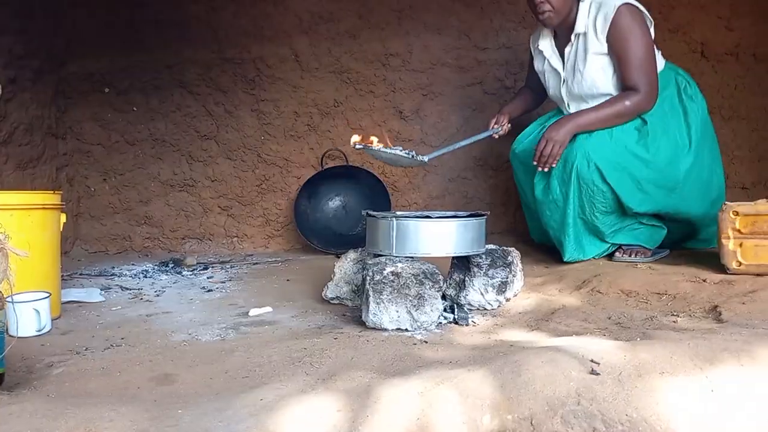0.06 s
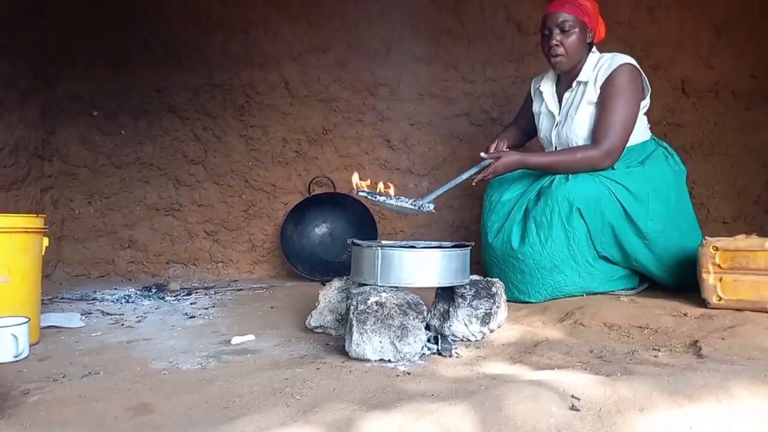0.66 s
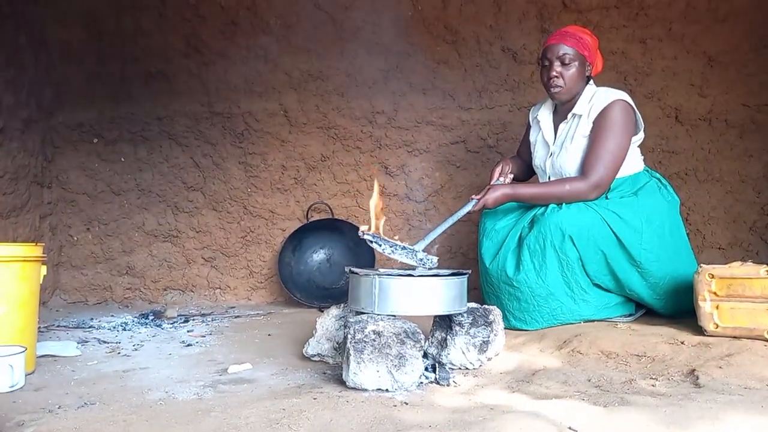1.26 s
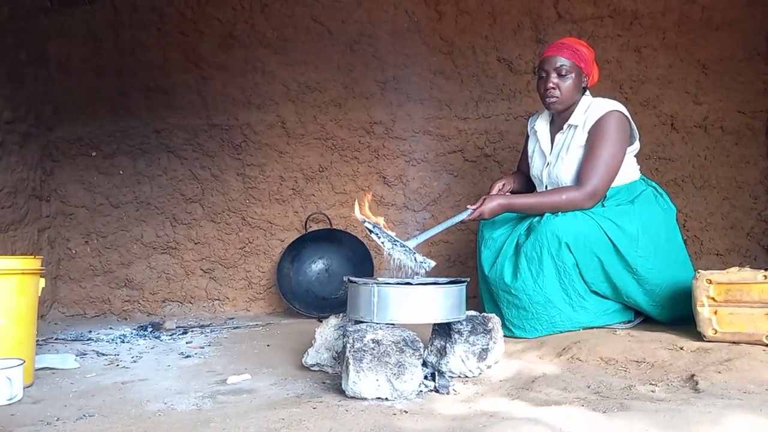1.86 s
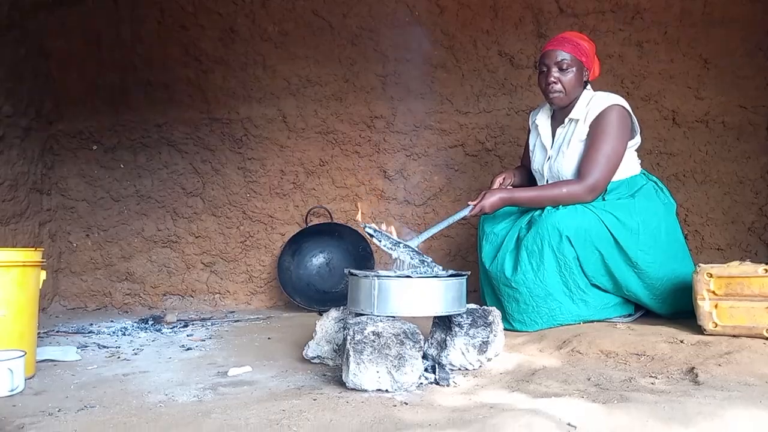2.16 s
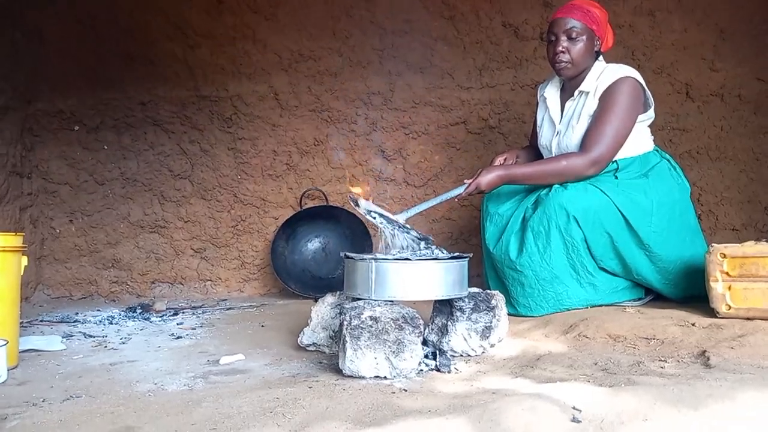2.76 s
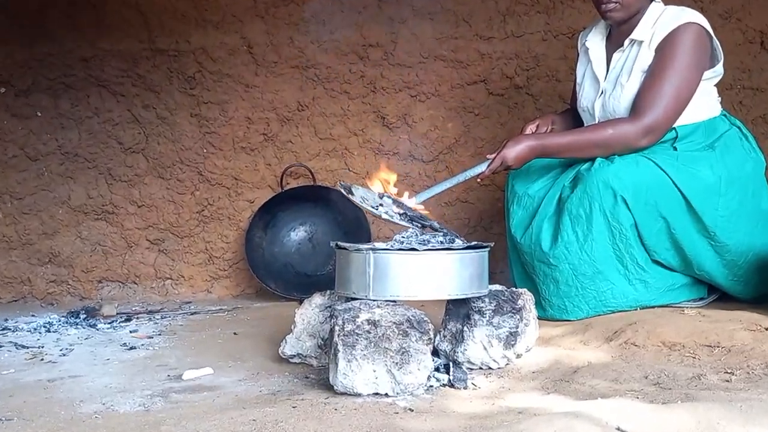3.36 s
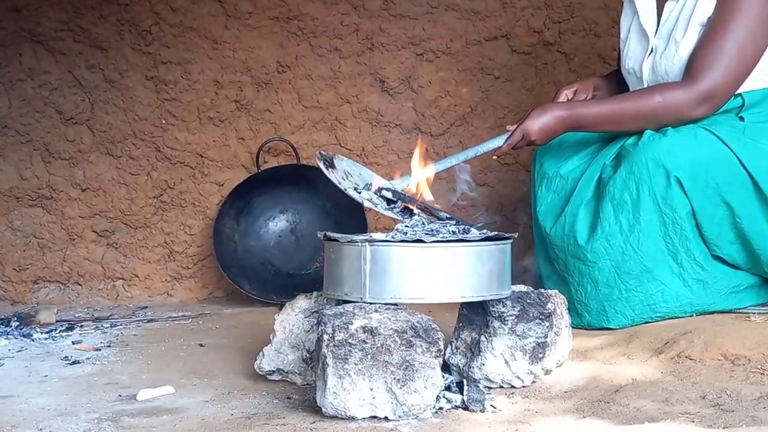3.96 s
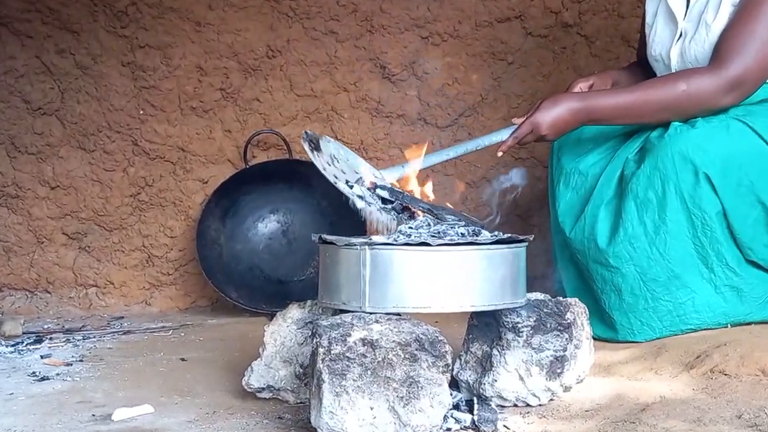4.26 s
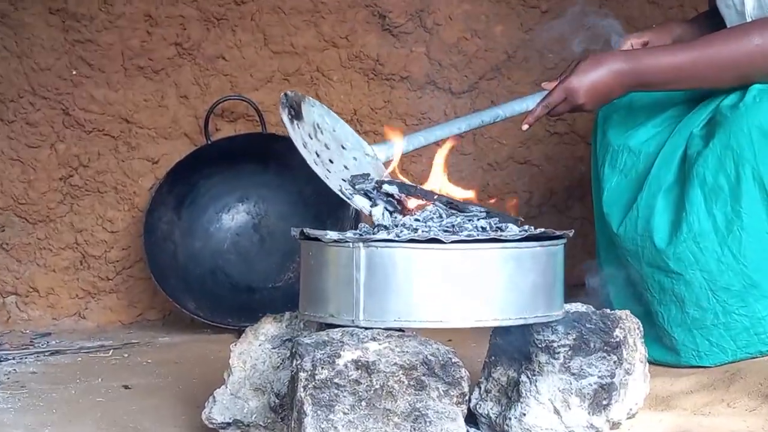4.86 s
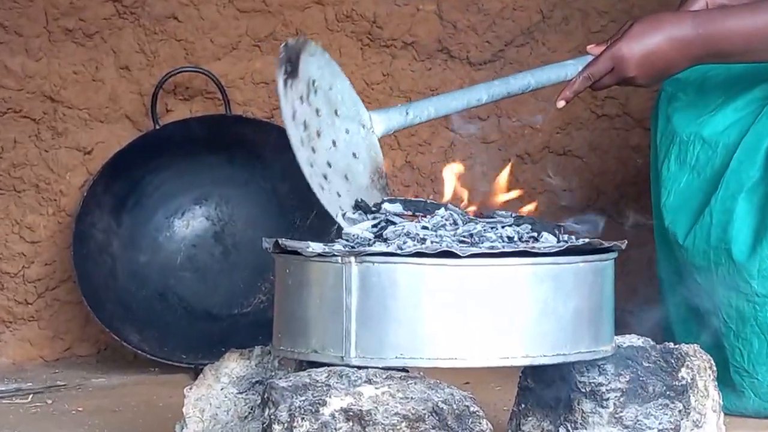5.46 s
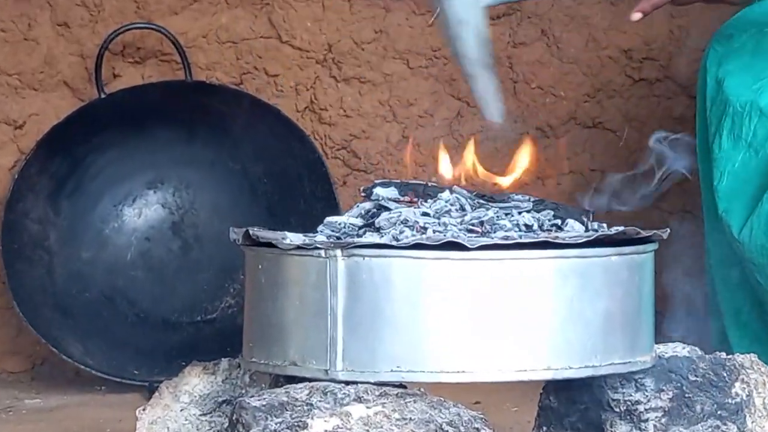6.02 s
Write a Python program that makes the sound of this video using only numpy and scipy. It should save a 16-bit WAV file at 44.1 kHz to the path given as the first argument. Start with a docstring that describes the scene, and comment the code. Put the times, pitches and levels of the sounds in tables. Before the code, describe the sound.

A metal ladle scrapes as embers clink and crunch across a thin sheet lid outdoors, with flames fluttering softly underneath.

```python
"""Burning charcoal tipped from a metal ladle onto a pot's thin sheet lid, before a mud wall.
Flames flutter and flare throughout. A far bird calls over the first 1.7 s; cloth rustles near 0.8 s.
At 1.1 s the first lumps knock the lid's modes into ringing. From 1.8 to 3.3 s the main pour: embers
rattle the sheet, crumbs crunch. Then the heap settles with short slips and ladle scrapes; heavy lumps
rock the pot from 3.9 s, and a coal cracks sharply at 4.7 s."""
import sys
import numpy as np
from scipy import signal
from scipy.fft import rfft, irfft
from scipy.io import wavfile

SR = 44100
rng = np.random.default_rng(int(sys.argv[2]) if len(sys.argv) > 2 else 0)


def bounce(signal):
    """Save signal as a 16-bit WAV file at the path given by the first command-line argument."""
    frames = np.transpose(np.atleast_2d(signal))
    limited = np.clip(frames, -1, 1)
    pcm = np.round(limited * 32767).astype(np.int16)
    wavfile.write(sys.argv[1], SR, pcm)


N = 272969
TIME = np.arange(N) / SR
RING_TIME = TIME[:16384]


# Clear lid modes: (frequency [Hz], width [Hz], relative level [dB])
LID_MODES = [(140, 20, 6), (218, 14, 14), (236, 12, 19), (272, 20, 8), (332, 16, 14), (359, 14, 26),
             (381, 14, 30), (414, 18, 20), (510, 20, 7), (694, 16, 13), (797, 22, 20), (832, 18, 22),
             (1168, 34, 13), (1411, 14, 12), (1669, 14, 17), (2043, 24, 14), (2280, 32, 13), (2520, 40, 7),
             (2880, 70, 4), (3120, 110, 5), (3650, 50, 5), (4040, 30, 7), (4258, 20, 14), (4615, 16, 16),
             (4810, 20, 10), (4960, 24, 11), (5044, 26, 17), (5295, 40, 8), (5540, 60, 4)]
# Dense-mode spectrum: (frequency [Hz], gain [dB])
SHEET_SPECTRUM = [(60, 3), (130, -4), (185, -9), (350, 3), (460, -3.5), (1000, 3.5), (1700, -8),
                  (2900, 0.5), (5000, -1), (6400, -1.5), (8500, 5.5), (11000, 1.5), (13500, 5.5),
                  (16000, -3)]

def lid_response():
    """Struck sheet: a click of dense modes, clear modes ringing on."""
    size = len(RING_TIME)
    cepstrum = irfft(np.log(spectrum_gain(SHEET_SPECTRUM, size)))
    cepstrum[1:size // 2] *= 2  # fold to minimum phase
    cepstrum[size // 2 + 1:] = 0
    click = irfft(np.exp(rfft(cepstrum)))
    modes = 0
    for hz, width_hz, db in LID_MODES:
        decay = np.exp(-np.pi * width_hz * RING_TIME)
        modes += undb(db) * 2 * np.pi * width_hz / SR * decay * np.cos(2 * np.pi * hz * RING_TIME)
    return click + 0.49 * convolve(click, modes)[0]


# Lid registers boom, clang, ring, hiss: (low [Hz], high [Hz])
LID_BANDS = [(90, 600), (600, 2000), (2000, 6500), (6500, 17000)]
# Blows, before trims: (time [s], ring level [dB], weight [dB], hardness [dB], clink [Hz])
LID_BLOWS = [(1.1, -48.5, -21, 6, 10000), (1.13, -40.5, -11, -10, 2660), (1.143, -41, -9, -17, 2840),
             (1.246, -57.5, -2, 1, 4920), (1.258, -54.5, -7, 2.5, 5580), (1.666, -71, 21, 5, 2950),
             (1.811, -53, 7, 2.5, 8120), (1.822, -48.5, 10, -9, 3040), (1.873, -34.5, -0.5, -5.5, 2960),
             (1.915, -38, 4.5, -8, 2700), (1.962, -40.5, -7, -11, 3185), (2.016, -26, -16, -7, 5140),
             (2.03, -33.5, -3, -13, 4880), (2.054, -36, 8, -5, 4400), (2.092, -39.5, 8.5, -10, 2220),
             (2.129, -36.5, -4, 1.5, 12200), (2.224, -50, 0, 1.5, 7160), (2.295, -34.5, 2.5, -0.5, 4450),
             (2.323, -42, 9, -14, 2350), (2.385, -48, 2.5, -0.5, 3760), (2.466, -37.5, -6.5, -8, 4580),
             (2.547, -38, -2, -6.5, 2790), (2.595, -41.5, 5.5, -4.5, 3490), (2.703, -44.5, 0, -1.5, 4050),
             (2.737, -46, 11.5, -2, 2945), (2.791, -47, 0, -4.5, 3110), (2.839, -50, 9, -4, 3200),
             (2.891, -47.5, 5, -7.5, 3230), (2.964, -39.5, 2, 0.5, 3183), (3.031, -46.5, 3, -4.5, 3210),
             (3.06, -47.5, 4.5, -9, 2830), (3.098, -45, 1.5, -13, 3140), (3.312, -68, 6.5, -5.5, 5400),
             (3.609, -58, 4, -7.5, 3400), (3.837, -47, 6.5, -0.5, 3060), (3.866, -48, -2, 1.5, 8950),
             (3.988, -59.5, -13, 6, 8530), (4.412, -47, -1, 1, 3450), (4.457, -38, -5, -2.5, 3500),
             (4.468, -30, 3, -4, 2965), (4.518, -34, 4.5, -8.5, 3800), (4.595, -48, -10, 2, 5280),
             (4.675, -47.5, -16, -17, 3190), (4.784, -54.5, 5, -2.5, 5240), (4.813, -51, 0.5, -14, 5180),
             (5.298, -68, 15, 0, 3210), (5.482, -60, 15, 5, 8600), (5.589, -56, -13, -1.5, 3230),
             (5.826, -57.5, 6.5, -9, 5500), (5.91, -46.5, 5, -5, 3400), (6.048, -68.5, 16, -9, 3050),
             (6.163, -76, 23, -9, 3330)]

def knocks(lid, trims_db=(-3.5, -4, -3.5, -3.5), clink_db=-11, push=36, contact_s=0.0012):
    """Lumps and ladle strike the lid: weight adds boom and clang, hardness adds hiss."""
    out = np.zeros((2, N))
    soft_push = push * RING_TIME * np.exp(-4 * RING_TIME / contact_s) * (4 / contact_s) ** 2 / SR
    for s, level_db, weight_db, hardness_db, clink_hz in LID_BLOWS:
        clang_db = 0.5 * weight_db - 2.16
        shares_db = (weight_db, clang_db, 0, hardness_db)
        blow = convolve(yard() + soft_push, lid)
        blow = blow + undb(4) * resonate(blow, clink_hz, width_hz=700)
        for (lo_hz, hi_hz), share_db, trim_db in zip(LID_BANDS, shares_db, trims_db):
            part = band(blow, lo_hz, hi_hz)
            add(out, s, part * undb(level_db + share_db + trim_db) / rms(part[:, :SR // 40]))
            if lo_hz <= clink_hz < hi_hz:
                lump = clink(clink_hz, t60_s=0.14, scatter=0.17, count=7)
                add(out, s, undb(level_db + share_db + clink_db) * lump)
    return out


def clink(hz, t60_s, scatter, count, rise_s=0.001):
    """A charcoal lump rings in a few close modes, different on each side."""
    t = RING_TIME[:SR // 8]
    modes_hz = np.minimum(hz * np.exp(scatter * rng.standard_normal((count, 1))), SR * 0.4)
    phasors = rng.standard_normal((2, count)) + 1j * rng.standard_normal((2, count))
    ring = ((phasors + phasors.mean(axis=0)) @ np.exp(2j * np.pi * modes_hz * t)).imag
    ring = ring * fade(t60_s)[:len(t)] * (1 - np.exp(-t / rise_s))
    return ring / rms(ring[:, :SR // 40])


# Main pour, stalling twice, before trims: (time [s], boom level [dB], scrape level [dB])
POUR_LEVELS = [(1.795, -50, -67), (1.825, -38.5, -52.5), (1.94, -43, -54.5), (2.06, -30, -39.5),
               (2.17, -43.5, -47), (2.39, -42.5, -47.5), (2.445, -55, -71), (2.55, -46, -52),
               (2.76, -39, -52), (2.875, -58, -58), (2.94, -45.5, -52.5), (3.12, -46, -52),
               (3.28, -59.5, -77)]
# Slips as the ladle is shaken or drawn back: (time [s], length [s], hiss level [dB], weight [dB])
EMBER_SLIPS = [(0.53, 0.044, -77, 0), (1.155, 0.072, -56, -5), (1.468, 0.021, -66, 1.5),
               (1.637, 0.021, -67.5, 9), (1.704, .03, -82.5, 29.5), (3.627, 0.044, -74.5, 17),
               (3.812, 0.066, -56, 4.5), (4.194, 0.043, -69.5, -18), (4.426, 0.15, -58.5, 6),
               (4.673, 0.064, -50, 2.5), (4.985, .14, -62, 2.5), (5.226, 0.035, -66, 4.5),
               (5.361, 0.04, -62.5, -1.5), (5.5, 0.014, -65.5, 9), (5.771, 0.082, -64.5, 3.5),
               (6.093, 0.045, -74.5, 12.5)]

def ember_drives(settle_from_s=3.2, settle_db=-75.5, settle_weight_db=1.5):
    """Drive per lid register from the pour, the slips and the settling heap."""
    pour_s, *levels_db = np.transpose(POUR_LEVELS)
    boom_db, scrape_db = [np.interp(TIME, pour_s, db, left=-120, right=-120) for db in levels_db]
    moves = [(undb(db) * swell(s, length_s, attack_s=0.026, release_s=0.044), weight_db)
             for s, length_s, db, weight_db in EMBER_SLIPS]
    moves.append((undb(settle_db) * (TIME > settle_from_s), settle_weight_db))
    fine = power_sum(gain for gain, _ in moves)
    heavy = power_sum(gain * undb(weight_db) for gain, weight_db in moves)
    boom = power_sum([undb(boom_db - 1.5), heavy])
    clang = power_sum([undb((boom_db + scrape_db) / 2 - 5), fine * undb(-11)])
    ring = power_sum([undb(scrape_db - 1.5), fine * undb(-5.5)])
    hiss = power_sum([undb(scrape_db - 6), fine])
    return boom, clang, ring, hiss


def slide(lid, drives, spots=8, spot_hits_per_s=90, spread_db=4.5, trims_db=(-1, -3, -1.5, -1)):
    """Sliding embers: streams of tiny, uneven impacts rattle the lid."""
    impacts = 0
    for _ in range(spots):
        sizes = undb(spread_db * np.minimum(rng.exponential(size=N), 4)) * rng.choice([-1, 1], N)
        hits = rng.random(N) < spot_hits_per_s / SR
        impacts += convolve(sizes * hits, yard(early_t60_s=0.09))
    rattle = convolve(impacts, lid)
    out = 0
    for (lo_hz, hi_hz), drive, trim_db in zip(LID_BANDS, drives, trims_db):
        part = band(rattle, lo_hz, hi_hz)
        out += part / rms(part) * drive * undb(trim_db)
    return out


def crumbs(ring, hiss, gain_db=-10.5, spread_db=5, count=300):
    """Crumbs crunch in dry ticks, as loud as the heap moves."""
    out = np.zeros((2, N))
    for when, pitch, size in rng.random((count, 3)):
        tick = clink(1800 * 7 ** pitch, t60_s=0.022, scatter=0.25, count=4)
        i = int(when * (N - 1))
        drive = ring[i] ** (1 - pitch) * hiss[i] ** pitch
        add(out, i / SR, drive * undb(gain_db + spread_db * (2 * size - 4)) * tick)
    return out


# Soft cloth rustle near 0.8 s, then gritty ladle scrapes:
# (time [s], length [s], resonance [Hz], width [Hz], level [dB])
RUBS_AND_RUSTLES = [(0.761, 0.2, 1110, 700, -69.5), (1.451, 0.077, 4950, 500, -78),
                    (1.417, 0.15, 750, 80, -68.5), (1.637, 0.12, 3020, 600, -74.5),
                    (2.125, 0.019, 12500, 400, -32), (2.551, 0.059, 2650, 400, -48.5),
                    (4.133, 0.17, 5080, 590, -71), (4.149, 0.18, 2340, 353, -77),
                    (4.139, 0.11, 7600, 1192, -71), (4.307, 0.3, 3350, 700, -65),
                    (4.659, 0.17, 3110, 403, -56), (4.965, 0.27, 3300, 700, -69),
                    (5.324, 0.32, 3200, 604, -70.5)]

def rubs(grain=0.35):
    """Rubs and rustles: grainy friction swells and fades in one resonance each."""
    out = np.zeros((2, N))
    for s, length_s, hz, width_hz, db in RUBS_AND_RUSTLES:
        size = int(length_s * SR)
        grit = np.exp(grain * np.repeat(rng.standard_normal(size), 128)[:size])
        friction = wide_noise(size) * grit
        rub = resonate(resonate(friction, hz, width_hz), hz, 2 * width_hz)
        add(out, s, rub / rms(rub) * undb(db) * np.sin(np.linspace(0, np.pi, size)))
    return out


# Pot notes: (time [s], frequency [Hz], level [dB], t60 [s])
POT_THUDS = [(3.867, 88.4, -44, 0.3), (4.409, 135, -41, 0.11), (4.525, 216, -30, .17),
             (4.533, 151, -42, 0.18), (5.491, 215, -58, 0.22)]

def thuds(rise_s=0.0052):
    """Heavy lumps rock the pot on its stones: one soft, low note each."""
    out = np.zeros((2, N))
    attack = 1 - np.exp(-RING_TIME / rise_s)
    for s, hz, db, t60_s in POT_THUDS:
        add(out, s, undb(db) * attack * fade(t60_s) * np.sin(2 * np.pi * hz * RING_TIME))
    return out


# Coals cracking: (time [s], level [dB])
COAL_TICKS = [(0.305, -62), (0.958, -59), (4.044, -47), (4.187, -55), (4.7418, -30), (5.2186, -38),
              (5.2675, -54), (6.1046, -46)]

def ticks(hz=12500, t60_s=0.0027, echo_db=-33):
    """A coal splits: brief snap, faint echo."""
    out = np.zeros((2, N))
    snap = fade(t60_s) * np.cos(2 * np.pi * hz * RING_TIME)
    for s, db in COAL_TICKS:
        add(out, s, undb(db) * (snap + undb(echo_db) * convolve(snap, yard())))
    return out


# Flares: (time [s], length [s], rumble level [dB], flap level [dB])
FIRE_FLARES = [(0.34, .06, -57.5, -77), (0.511, .04, -57, -56.5), (0.739, .19, -51, -63.5),
               (1.146, .1, -82, -60), (1.457, 0.044, -55, -69), (1.63, 0.13, -57, -62.5),
               (1.863, 0.15, -54, -50), (2.19, 0.15, -63, -54), (2.575, 0.23, -57.5, -57),
               (2.99, 0.086, -58, -53), (3.13, 0.081, -50, -64), (3.826, 0.098, -51.5, -59),
               (4.242, 0.22, -48, -62.5), (4.54, .04, -45, -46), (4.665, .1, -64, -61),
               (4.99, 0.025, -51, -68), (5.388, .14, -53.5, -69), (5.916, 0.019, -54, -63)]

def flames(flutter_per_s=12, depth_db=1.5, growth_db_per_s=0.6, rumble_trim_db=-1):
    """Fire flutters and flares: low rumble, flapping above. The flutter grows as the fire nears."""
    wander = np.interp(TIME * flutter_per_s, np.arange(256), rng.standard_normal(256))
    flutter = undb(depth_db * wander + growth_db_per_s * (TIME - TIME.mean()))
    burns = [(swell(s, length_s, attack_s=0.02, release_s=0.047), rumble_db, flap_db)
             for s, length_s, rumble_db, flap_db in FIRE_FLARES]
    burns.append((flutter, -67.5, -70))
    rumble_gain = power_sum(gain * undb(db + rumble_trim_db) for gain, db, _ in burns)
    flap_gain = power_sum(gain * undb(db) for gain, _, db in burns)
    rumble = colour(wide_noise(N), [(20, -45), (40, -17), (55, -14.5), (68, 1), (88, -4), (115, -8),
                                    (200, -43), (600, -80.5)])
    flap = band(wide_noise(N), 110, 288)
    return rumble / rms(rumble) * rumble_gain + flap / rms(flap) * flap_gain


# Calls: (time [s], length [s], start pitch [Hz], turning pitch [Hz], relative level [dB])
BIRD_CALLS = [(0.174, 0.13, 1680, 1793, -71.5), (.22, 0.22, 1185, 1168, -72),
              (0.435, 0.096, 1770, 1910, -71.5), (0.69, 0.1, 1800, 1970, -64),
              (0.98, 0.083, 1810, 1980, -66.5), (0.847, 0.71, 1100, 1062, -70.5),
              (1.257, .09, 1860, 1974, -68), (1.492, 0.11, 1850, 1984, -63.5),
              (1.67, 0.057, 1920, 2040, -69)]

def bird(rasp_hz=110, echo_t60_s=0.21, gain_db=-3):
    """Far, raspy calls glide and ease back, blurred by echoes."""
    calls = np.zeros((2, N))
    for s, length_s, start_hz, turn_hz, db in BIRD_CALLS:
        progress = np.linspace(0, 1, int(length_s * SR))
        hz = start_hz + (turn_hz - start_hz) * np.sin(np.pi * progress * 3 / 5)
        rasp = band(rng.standard_normal(len(progress)), 2.4, rasp_hz, order=2)
        envelope = np.sqrt(np.abs(np.sin(np.pi * progress)))
        voice = (1 + rasp / rms(rasp)) * envelope * np.sin(2 * np.pi * np.cumsum(hz) / SR)
        add(calls, s, undb(db + gain_db) * voice / rms(voice))
    echo = wide_noise(len(RING_TIME)) * fade(echo_t60_s)
    return 0.22 * calls + 0.65 * convolve(calls, echo / np.linalg.norm(echo[0]))


# Outdoor hush plus microphone hiss: (frequency [Hz], relative density [dB])
BACKGROUND_SPECTRUM = [(24, -45), (40, -9), (69, -2.5), (144, -7), (276, -12), (345, -4), (433, -15.5),
                       (918, -21.5), (1760, -24.5), (2150, -28), (6170, -38.5), (8340, -30), (11600, -36.5),
                       (13100, -58), (16000, -72.5)]

def background(level_db=-73.5):
    """Low outdoor hush plus microphone hiss near 8.3 kHz; level set above 200 Hz."""
    noise = colour(wide_noise(N), BACKGROUND_SPECTRUM)
    return noise * undb(level_db) / rms(band(noise, 200, 16000))


def yard(direct=2.2, rise_s=0.00094, early_t60_s=0.15, late_t60_s=0.18, late_db=-17):
    """Direct sound, dense scatter off ground and wall, faint longer tail."""
    echo = wide_noise(len(RING_TIME)) * (fade(early_t60_s) + undb(late_db) * fade(late_t60_s))
    echo *= 1 - np.exp(-RING_TIME / rise_s)
    echo[:, 0] += direct
    return echo


def wide_noise(size):
    """Stereo noise: alike in the bass, nearly unrelated in the treble."""
    mid, side = rng.standard_normal((2, size))
    side = colour(side, [(100, -13), (380, -17), (800, -12), (1300, -4.5), (4000, -3.5), (9000, -0.5)])
    return np.array([mid + side, mid - side])


def undb(db):
    """Decibels to gain."""
    return 10 ** (np.asarray(db) / 20)


def rms(x):
    """Root mean square."""
    return np.sqrt(np.mean(x ** 2)) + 1e-12


def power_sum(gains):
    """Joint gain of unrelated sounds."""
    return np.sqrt(sum(g ** 2 for g in gains)) + 1e-9


def fade(t60_s):
    """Exponential decay."""
    return np.exp(-np.log(1000) * RING_TIME / t60_s)


def swell(s, length_s, attack_s, release_s):
    """Attack-hold-release gain."""
    return np.exp(-np.maximum(s - TIME, 0) / attack_s - np.maximum(TIME - s - length_s, 0) / release_s)


def band(x, lo_hz, hi_hz, order=3):
    """Causal band-pass."""
    return signal.sosfilt(signal.butter(order, [lo_hz, hi_hz], "band", fs=SR, output="sos"), x)


def resonate(x, hz, width_hz):
    """One resonance, unity gain at centre."""
    return signal.lfilter(*signal.iirpeak(hz, hz / width_hz, fs=SR), x)


def spectrum_gain(points, size):
    """Gain per FFT bin from (frequency [Hz], gain [dB]) points."""
    hz, db = np.transpose(points)
    bins_hz = np.fft.rfftfreq(size, 1 / SR)
    return undb(np.interp(np.log(bins_hz + 1), np.log(hz), db))


def colour(x, points):
    """Zero-phase EQ through (frequency [Hz], gain [dB]) points."""
    size = x.shape[-1]
    return irfft(rfft(x) * spectrum_gain(points, size), size)


def convolve(x, response):
    """Convolution cut to input length."""
    return signal.fftconvolve(np.atleast_2d(x), np.atleast_2d(response), axes=-1)[:, :x.shape[-1]]


def add(out, s, sound):
    """Mix in at time s."""
    i = max(int(s * SR), 0)
    out[:, i:i + sound.shape[-1]] += sound[..., :N - i]


def scene():
    """Embers on the lid, flames, surroundings."""
    lid = lid_response()
    boom, clang, ring, hiss = ember_drives()
    embers = knocks(lid) + slide(lid, (boom, clang, ring, hiss)) + crumbs(ring, hiss)
    return embers + rubs() + thuds() + ticks() + flames() + bird() + background()


def record(dry):
    """Left microphone brighter, right fuller; 16 kHz low-pass."""
    # (frequency [Hz], left minus right [dB])
    lean = [(100, -2), (400, -2), (800, -3.5), (1400, -0.5), (2400, 0.5), (5000, 1.5), (9000, 0.8),
            (12000, 3.5), (15000, 7.5)]
    left = colour(dry[0], [(hz, db / 2) for hz, db in lean])
    right = colour(dry[1], [(hz, -db / 2) for hz, db in lean])
    low_pass = signal.ellip(8, 0.2, 70, 16000, fs=SR, output="sos")
    return signal.sosfilt(low_pass, np.array([left, right]))


dry = scene()
out = record(dry)
bounce(out)
```